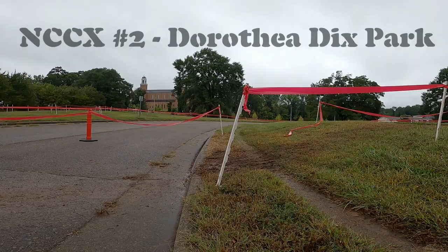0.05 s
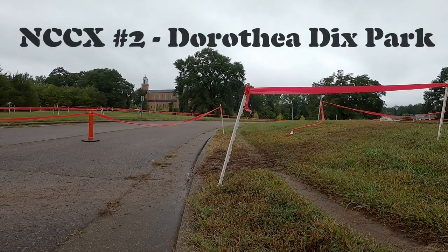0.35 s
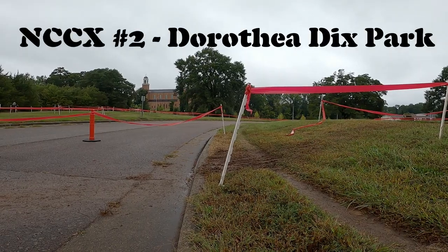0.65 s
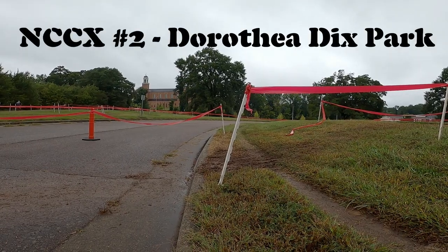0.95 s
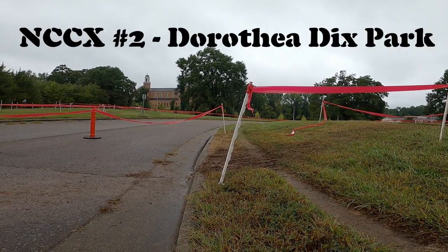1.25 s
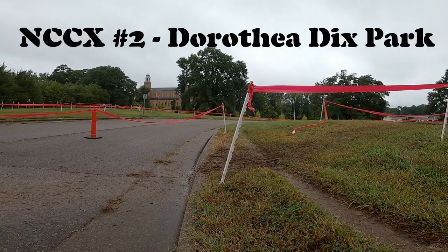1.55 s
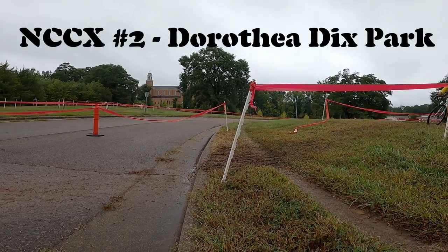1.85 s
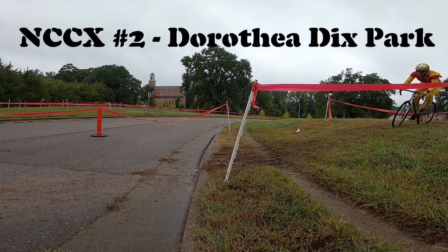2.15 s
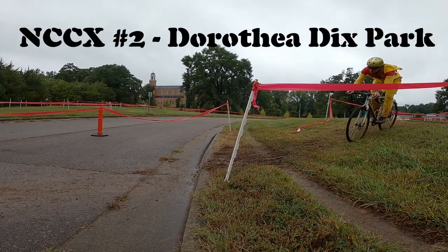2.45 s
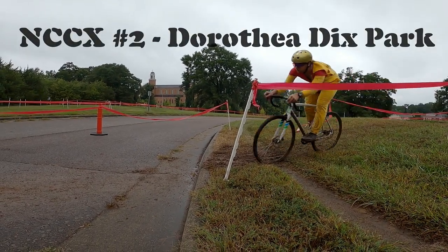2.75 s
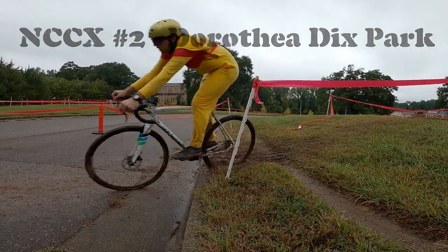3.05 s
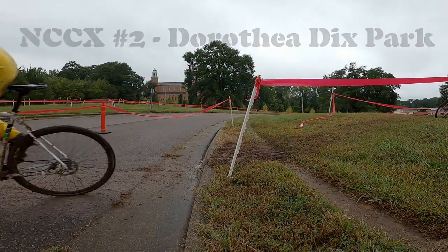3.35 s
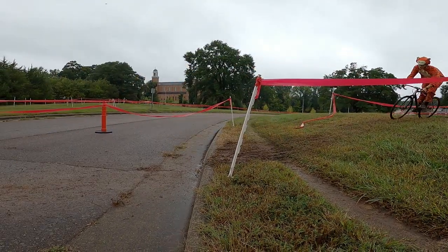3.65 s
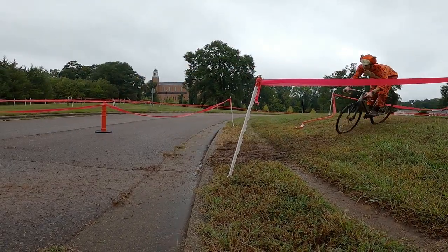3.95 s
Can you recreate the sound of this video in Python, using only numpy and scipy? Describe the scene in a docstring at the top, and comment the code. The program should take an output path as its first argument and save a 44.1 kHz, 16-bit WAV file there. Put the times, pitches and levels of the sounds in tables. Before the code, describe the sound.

A bicycle rolls past close to the microphone outdoors. First come wind, a low traffic hum and bird chirps; then the freewheel ticks, tyres swish and crunch, and both wheels thud down, rattling the chain and frame.

```python
"""Bicycle over grass, grit and a kerb

A coasting bicycle swishes down a grassy bank, crunches over dirt and drops onto wet pavement close by.
Its freewheel ticks, stones clack against it, and each wheel lands with a thud that rattles chain and frame.
Behind it sit far tyre scuffs, a small bird, low drones and a bed of wind and traffic. Almost mono."""
import sys
import numpy as np
from scipy import signal
from scipy.fft import rfft, irfft, next_fast_len
from scipy.io import wavfile
from scipy.ndimage import uniform_filter1d, map_coordinates

SR = 44100
rng = np.random.default_rng(int(sys.argv[2]) if len(sys.argv) > 2 else 0)


def wav_out(sig):
    """Save sig, one row per channel (or a flat mono array), as 16-bit PCM at SR to the path in sys.argv[1]."""
    wavfile.write(sys.argv[1], SR, np.round(np.clip(np.atleast_2d(sig).T, -1, 1) * 32767).astype(np.int16))


N = 176400

# Tyre envelopes on grass, grit and wet ground (time [s], level [dB])
SWISH_LEVEL = [(2.5, -80), (2.758, -46), (2.778, -26.5), (2.805, -32), (2.825, -26.5), (2.845, -32),
               (2.868, -27), (2.89, -32), (2.935, -25.5), (2.952, -28), (2.97, -22.5), (3.02, -29),
               (3.06, -35), (3.12, -46), (3.3, -80)]
CRUNCH_LEVEL = [(1.5, -82), (2, -56), (2.75, -38.5), (2.88, -33), (2.93, -29.5), (2.99, -30), (3.06, -36.5),
                (3.14, -36), (3.23, -31), (3.3, -33.5), (3.45, -37.5), (3.49, -31.5), (3.57, -33),
                (3.72, -30.5), (3.8, -35), (4, -36)]
SPRAY_LEVEL = [(1.2, -47), (1.7, -47), (1.92, -42), (2.1, -44), (2.74, -41), (2.92, -57), (3.01, -30.5),
               (3.07, -33.5), (3.13, -36.5), (3.21, -26), (3.25, -34), (3.44, -34.5), (3.48, -32),
               (3.62, -38), (3.71, -35.5), (3.78, -37.5), (4, -40.5)]
# Tone colour of those three surfaces (frequency [Hz], gain [dB])
GRASS_EQ = [(1000, -40), (2300, 0), (2800, -1.5), (3400, -19), (3950, 1), (4600, 3.5), (5500, -2),
            (6300, -13), (7500, -22), (10300, -24.5), (15500, -65)]
GRIT_EQ = [(40, -40), (150, -59), (400, -5), (750, -5), (1200, -0.5), (1850, 3), (2600, -4), (3500, -15.5),
           (6000, -10), (12000, -44)]
WET_EQ = [(1500, 1.5), (3200, 2), (4400, 4), (5300, -3.5), (6600, -3), (8500, -19.5), (10300, -18),
          (12000, -32), (15500, -45)]
# Rattles on landing (time [s], rise [s], fall [s], level before trim [dB], centre [Hz])
RATTLES = [(3.158, 0.0006, 0.0056, -22.5, 4500), (3.172, 0.0038, 0.024, -20, 994),
           (3.173, .002, 0.0044, -18, 4332), (3.187, 0.013, 0.0058, -13, 1770),
           (3.204, 0.002, 0.0069, -20, 4600), (3.216, .006, 0.0031, -20, 1880),
           (3.354, 0.0011, 0.036, -24, 701.6), (3.369, 0.012, 0.03, -21.5, 1472),
           (3.376, 0.017, 0.018, -24.5, 5660), (3.424, .004, 0.005, -25, 1100),
           (3.476, 0.0072, 0.011, -23.5, 1700), (3.715, .010, 0.0094, -45, 1780)]
# Tyre thuds (time [s], level [dB])
THUDS = [(3.193, -16), (3.217, -10), (3.353, -19)]
# Stone and chain hits (time [s], relative level [dB], pitch [Hz], ring t60 [s])
CLACKS = [(1.9415, -15, 4200, .004), (1.9585, -20, 1700, .004), (2.906, -7, 1900, .005),
          (2.923, -21, 1850, .025), (2.932, -17, 1900, .012), (2.989, -21, 2000, .012),
          (3.000, -8, 1500, .004), (3.094, -14, 1950, .011), (3.0945, -19, 1152, .036),
          (3.158, -14, 930, .011), (3.171, -16, 1950, .007), (3.178, -12, 1400, .007),
          (3.1845, -10, 2000, .005), (3.190, -13, 1900, .02), (3.213, -19, 4300, .006),
          (3.257, -19, 3280, .016), (3.259, -16, 2100, .005), (3.338, -21, 1390, .012),
          (3.3505, -9, 820, .006), (3.363, -19, 1550, .012), (3.3815, -15, 4700, .012),
          (3.411, -4, 3250, .007), (3.4112, -9, 2150, .006), (3.415, -21, 3300, .035),
          (3.4755, -17, 2900, .005), (3.477, -21, 1136, .05), (3.551, -23, 6500, .006),
          (3.703, -20, 5800, .008), (3.715, -19, 1820, .014), (3.806, -21, 1880, .006)]
# Top-end roll-off on rattles and clacks (frequency [Hz], gain [dB])
TREBLE_LOSS = [(7000, 2.5), (10500, -9), (12000, -18), (16000, -37)]
# Modes of frame and chain (frequency [Hz], relative level [dB], t60 [s])
FRAME_MODES = [(1140, -5, 0.1), (1295, -2, 0.11), (1675, 0, 0.08), (1810, 2, 0.08), (2050, 1, 0.04),
               (3210, -1, 0.05), (3580, 0, 0.07)]
# Freewheel ticking (time [s], rate [ticks/s], level [dB])
FREEWHEEL = [(1.5, 48, -71), (2.14, 37, -57), (2.19, 50, -49), (2.35, 53, -49.5), (2.58, 58, -46),
             (2.72, 98, -45.5), (3.05, 85, -37.5), (3.2, 83, -37), (3.25, 84, -44), (3.3, 75, -32),
             (3.38, 82, -46), (3.42, 70, -76), (4, 140, -67)]
# Tone colour of a pawl snap (frequency [Hz], gain [dB])
PAWL_EQ = [(1000, -24), (2500, 16.5), (4500, 17.5), (6500, 3), (8500, 6.5), (10300, 1), (12000, -8),
           (14300, -15), (15500, -32)]
# Far tyre scuffs (time [s], half-width [s], level [dB])
SCUFFS = [(0.706, .035, -46.5), (1.036, 0.087, -44), (1.717, 0.077, -44.5), (2.05, 0.028, -41)]
# The bird's falling chirps and lower arched notes (time [s], level [dB])
CHIRPS = [(0.592, -35), (.838, -30.5), (1.070, -28.5), (1.339, -29.5), (2.283, -30.5), (2.526, -29),
          (2.763, -25.5)]
ARCHED_NOTES = [(.70, -42.5), (.935, -35), (1.18, -34.5), (2.40, -33.5), (2.625, -30.5)]
# Its high calls (time [s], level [dB], start pitch [Hz], end pitch [Hz], rasp depth [Hz])
HIGH_CALLS = [(1.675, -36.5, 3200, 3420, 30), (1.885, -39, 3900, 3650, 60), (2.389, -36, 4120, 3063, 240)]
# Low drones (time [s], pitch [Hz], level [dB])
FAR_ENGINE = [(0, 118.8, -48.5), (.7, 116.5, -39.5), (1.6, 112.4, -36.5), (2.2, 108.5, -35),
              (2.55, 105.4, -37.5), (3.05, 107.3, -35.5), (4, 101.5, -41)]
UPPER_HUM = [(1.2, 235, -52), (2, 230, -41), (2.25, 229, -35.5), (2.5, 225, -37), (2.75, 221, -31.5),
             (2.92, 223, -31.5), (3.05, 227, -38), (3.4, 218, -56)]
LATE_HUM = [(3.1, 172, -54), (3.2, 171, -42), (3.5, 171.8, -37), (4, 169.4, -50.5)]
# Tone colour of wind and far traffic (frequency [Hz], gain [dB])
WIND_EQ = [(210, -17), (350, 0.5), (444, 0), (726, -3.5), (936, -0.5), (1480, 0.5), (2070, -1),
           (2420, -4.5), (2890, -6.5), (3170, -6), (6480, -24.5), (7960, -39.5), (10600, -47), (15500, -75)]
TRAFFIC_EQ = [(20, -48), (30, -49), (45, -16.5), (62, -19), (85, -5.5), (110, -6), (140, -8), (185, -5.5),
              (240, -6), (290, -11.5), (400, -26), (600, -32), (1200, -120)]
# Traffic envelope (time [s], level [dB])
TRAFFIC_LEVEL = [(0.1, -34), (1.2, -36), (2.2, -34), (3.2, -34), (4, -35)]
# Stereo width (frequency [Hz], side over mid [dB])
WIDTH = [(30, -27), (120, -82), (350, -40.5), (1500, -60.5), (3500, -50), (7000, -28), (10000, -28),
         (13000, -3)]


def amp(db):
    return 10 ** (np.asarray(db) / 20)


def unit(x):
    return x / np.sqrt(np.mean(x ** 2) + 1e-20)


def curves(rows):
    """One value per sample for each column after the time."""
    times, *columns = np.transpose(rows)
    return [np.interp(np.arange(N) / SR, times, column) for column in columns]


def wobble(rate):
    """A smooth random curve, rate knots a second."""
    return map_coordinates(rng.standard_normal(1024), [np.arange(N) * rate / SR], mode="wrap")


def filtered(x, response):
    """x shaped by a gain that depends on frequency."""
    n = x.shape[-1]
    padded = next_fast_len(n + 4096)
    return irfft(rfft(x, padded) * response(np.fft.rfftfreq(padded, 1 / SR)), padded)[..., :n]


def eq(x, points):
    """x through an EQ curve drawn on a log frequency axis."""
    freqs, db = np.transpose(points)
    return filtered(x, lambda hz: amp(np.interp(np.log(hz + 1), np.log(freqs + 1), db)))


def resonance(x, centre_hz, octaves, skirt_db):
    """x through a broad bell on a flat skirt, top end rolled off, at rms 1."""
    bell = lambda hz: np.exp(-.5 * (np.log2((hz + 1) / centre_hz) / octaves) ** 2) + amp(skirt_db)
    return unit(eq(filtered(x, bell), TREBLE_LOSS))


def grains(per_s, spread_db, share):
    """Tiny random impacts on a bed of noise; share is their part of the power."""
    hits = (rng.random(N) < per_s / SR) * rng.choice([-1, 1], N)
    sizes = amp(spread_db * np.minimum(rng.exponential(size=N), 4))
    return np.sqrt(share) * unit(hits * sizes) + np.sqrt(1 - share) * rng.standard_normal(N)


def add(out, s, sound):
    """Mix a sound into out at time s."""
    part = out[round(s * SR):][:len(sound)]
    part += sound[:len(part)]


def tyres():
    """The rolling tread stirs fine grains of grass and spray, and coarser grains of grit."""
    def surface(texture, colour, level, flutter_rate, flutter_db=1.5):
        return unit(eq(texture, colour)) * amp(curves(level)[0] + flutter_db * wobble(flutter_rate))

    swish = surface(grains(per_s=6300, spread_db=3.7, share=.34), GRASS_EQ, SWISH_LEVEL, 90)
    spray = surface(grains(per_s=2500, spread_db=2.6, share=.59), WET_EQ, SPRAY_LEVEL, 110)
    crunch = surface(grains(per_s=800, spread_db=4, share=.65), GRIT_EQ, CRUNCH_LEVEL, 110)
    return swish + spray + crunch


def landings(rattle_trim_db=-2, thud_hz=155, thud_rise_s=.0023, thud_t60=.059):
    """Each wheel thuds onto the pavement and shakes bursts of rattle from chain and frame."""
    out, t = np.zeros(N), np.arange(N) / SR
    for s, rise, fall, db, hz in RATTLES:
        swell = np.exp(-np.maximum((s - t) / rise, (t - s) / fall))
        contacts = grains(per_s=2500, spread_db=2.5, share=.7)
        out += amp(db + rattle_trim_db) * swell * resonance(contacts, hz, octaves=.64, skirt_db=-26)
    attack = 1 - np.exp(-t / thud_rise_s)
    for s, db in THUDS:
        add(out, s, attack * amp(db - 60 * t / thud_t60) * np.sin(2 * np.pi * thud_hz * t))
    return out


def clacks(blur_hz=70, rise_s=.0003, crack_db=-16.5, crack_t60=.032):
    """Stones and chain strike the bicycle: dry snaps and pitched knocks with a brief rough tail."""
    out, t = np.zeros(N), np.arange(SR // 10) / SR
    for s, db, hz, t60 in CLACKS:
        phase_drift = np.sqrt(2 * np.pi * blur_hz / SR) * np.cumsum(rng.standard_normal(len(t)))
        envelope = (1 - np.exp(-t / rise_s)) * amp(-60 * t / t60)
        ring = 1.5 * envelope * np.sin(2 * np.pi * hz * t + phase_drift)
        noise = resonance(rng.standard_normal(len(t)), hz, octaves=.5, skirt_db=-57)
        crack = noise * amp(crack_db - 60 * t / crack_t60)
        add(out, s, amp(db) * (ring + crack))
    return eq(out, TREBLE_LOSS)


def frame_ring(impacts, ring_db=-11):
    """The impacts plus the short ring they excite in the metal parts."""
    t = np.arange(SR // 8) / SR
    modes = sum(amp(db - 60 * t / t60) * np.sin(2 * np.pi * hz * t) for hz, db, t60 in FRAME_MODES)
    ring = unit(signal.fftconvolve(impacts, modes)[:N])
    return impacts + amp(ring_db) * np.std(impacts) * ring


def freewheel(jitter=.12, rise_s=.0008, decay_s=.0024):
    """The pawls snap over the ratchet, faster as the wheel speeds up."""
    rate, db = curves(FREEWHEEL)
    teeth_passed = np.cumsum(rate * (1 + jitter * wobble(40))) / SR
    tick_db = rng.uniform(-3, 5, N)[teeth_passed.astype(int)]
    age = (teeth_passed % 1) / rate
    envelope = (1 - np.exp(-age / rise_s)) ** 2 * np.exp(-age / decay_s)
    snaps = amp(tick_db) * envelope * rng.standard_normal(N)
    return unit(eq(snaps, PAWL_EQ)) * amp(db)


def scuffs():
    """Soft, far swells of tyre hiss."""
    t = np.arange(N) / SR
    swells = sum(amp(db) * np.exp(-((t - s) / half_width) ** 2) for s, half_width, db in SCUFFS)
    return swells * unit(eq(rng.standard_normal(N), WET_EQ))


def bird(chirp_s=.0382, chirp_hz=3248, fall_hz=875, note_s=.054, note_hz=1937, arch_hz=155, call_s=.057):
    """Falling whistles, softer arched notes and a few faint high calls, the last one raspy."""
    def whistle(hz, progress):
        return np.sin(np.pi * progress) ** 2 * np.sin(2 * np.pi * np.cumsum(hz) / SR)

    out = np.zeros(N)
    progress = np.linspace(0, 1, int(chirp_s * SR))
    for s, db in CHIRPS:
        detune = rng.normal(1, .0018)
        add(out, s, amp(db) * whistle((chirp_hz - fall_hz * progress) * detune, progress))
    progress = np.linspace(0, 1, int(note_s * SR))
    for s, db in ARCHED_NOTES:
        add(out, s, amp(db) * whistle(note_hz + arch_hz * np.sin(np.pi * progress), progress))
    progress = np.linspace(0, 1, int(call_s * SR))
    for s, db, from_hz, to_hz, rasp_hz in HIGH_CALLS:
        glide = from_hz + (to_hz - from_hz) * progress
        rasp = rasp_hz * wobble(400)[:len(progress)]
        add(out, s, amp(db) * whistle(glide + rasp, progress))
    return out


def drone(rows, waver_hz, flutter_db):
    """A low wavering tone that sinks slowly."""
    hz, db = curves(rows)
    phase = 2 * np.pi * np.cumsum(hz + waver_hz * wobble(14)) / SR
    return np.sqrt(2) * np.sin(phase) * amp(db + flutter_db * wobble(12))


def open_air(wind_db=-37):
    """Wind in far trees over a traffic rumble, both gently restless."""
    wind = unit(eq(rng.standard_normal(N), WIND_EQ)) * amp(wind_db + .77 * wobble(10.61))
    traffic = unit(eq(rng.standard_normal(N), TRAFFIC_EQ))
    return wind + traffic * amp(curves(TRAFFIC_LEVEL)[0] + .81 * wobble(7.46))


def stereo_side(mid):
    """Diffuse noise that follows the mix in colour and level and widens the top treble."""
    envelope = np.sqrt(np.abs(uniform_filter1d(mid ** 2, size=1024)))
    spectrum = np.sqrt(np.abs(uniform_filter1d(np.abs(rfft(mid)) ** 2, size=401)))
    diffuse = unit(irfft(rfft(rng.standard_normal(N)) * spectrum, N))
    return eq(diffuse * envelope, WIDTH)


def scene():
    """The bicycle up front and the outdoor bed behind it, both centred."""
    drones = drone(FAR_ENGINE, waver_hz=.95, flutter_db=1.4)
    drones += drone(UPPER_HUM, waver_hz=7, flutter_db=2.8)
    drones += drone(LATE_HUM, waver_hz=1.4, flutter_db=4.6)
    bicycle = freewheel() + tyres() + frame_ring(landings() + clacks())
    mid = open_air() + drones + bird() + scuffs() + bicycle
    side = stereo_side(mid)
    return np.array([mid + side, mid - side])


def record(dry):
    """An instant of silence at the head and a steep high cut on the mix."""
    start_s, top_hz = .036, 15600
    return filtered(dry * (np.arange(N) > start_s * SR), lambda hz: hz < top_hz)


dry = scene()
out = record(dry)
wav_out(out)
```